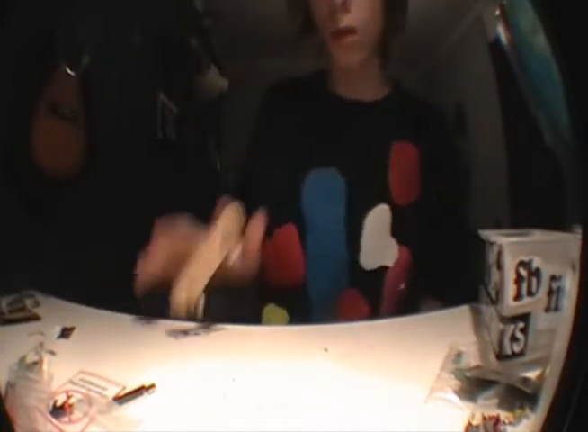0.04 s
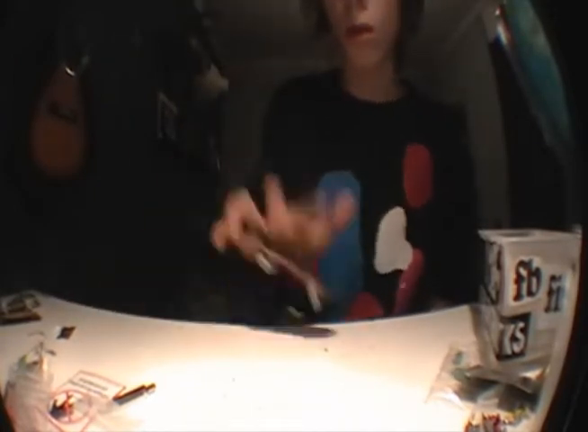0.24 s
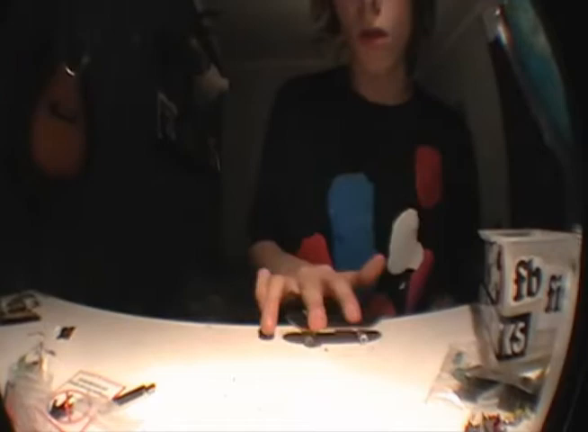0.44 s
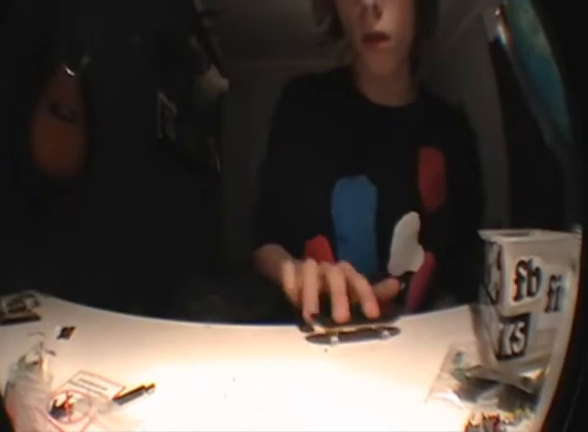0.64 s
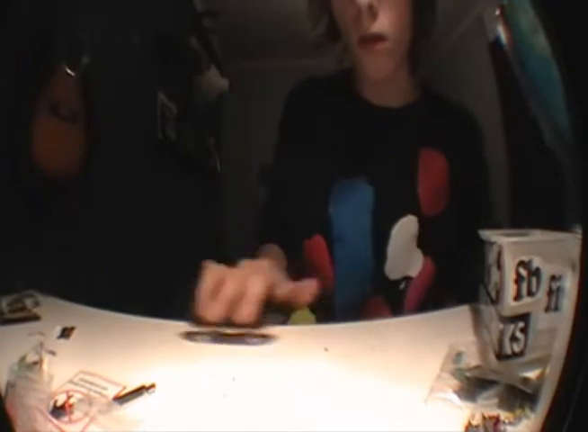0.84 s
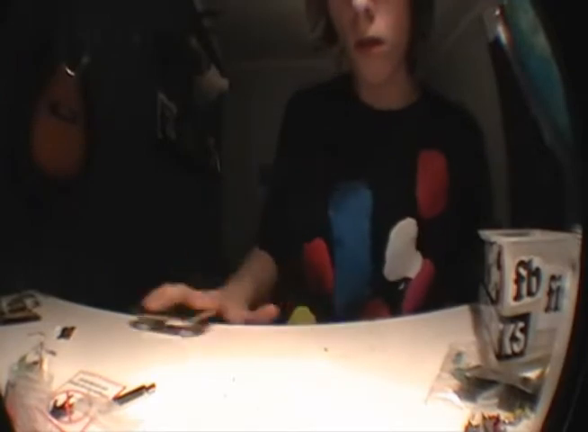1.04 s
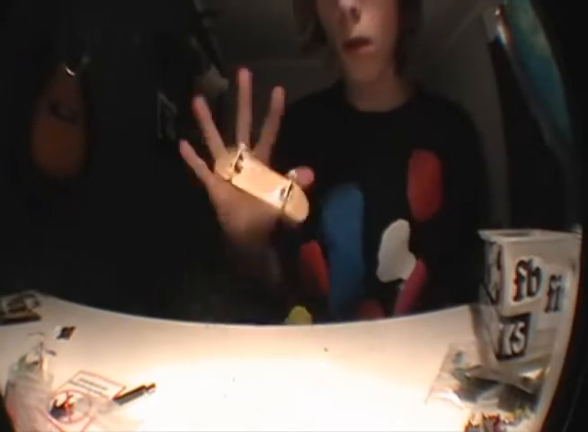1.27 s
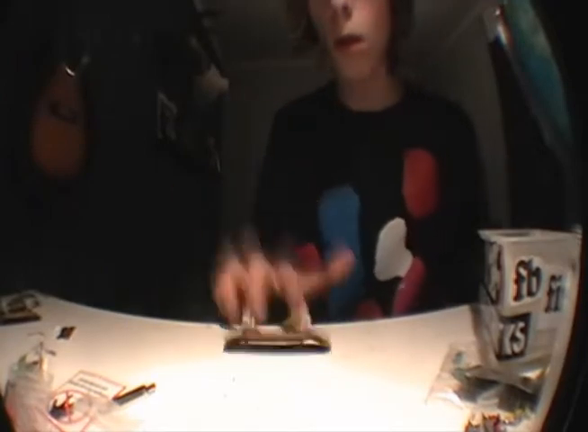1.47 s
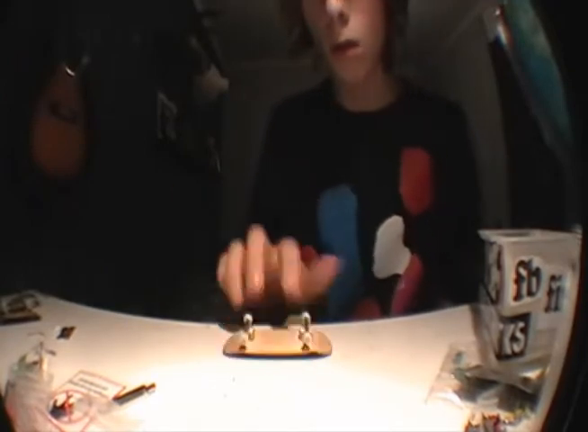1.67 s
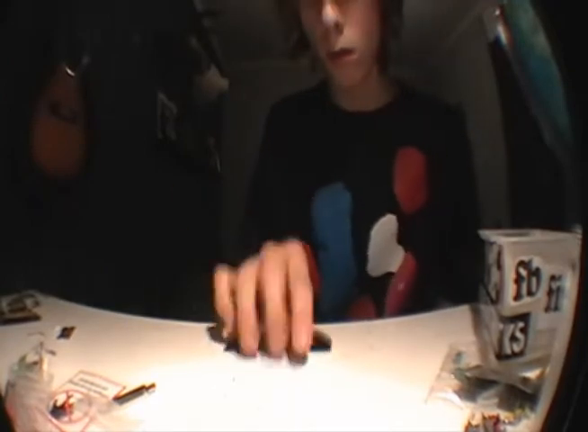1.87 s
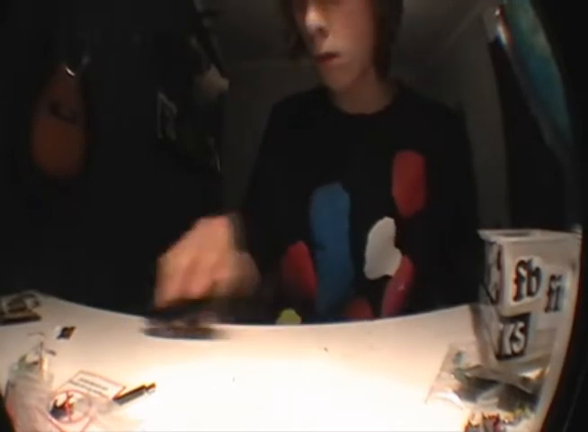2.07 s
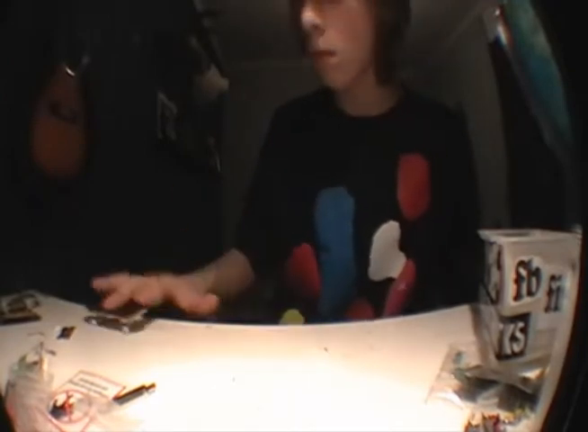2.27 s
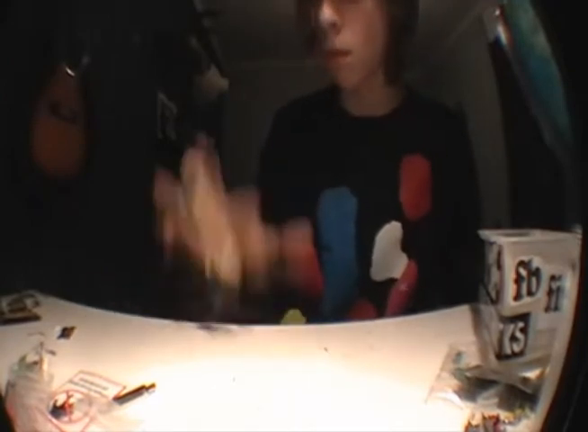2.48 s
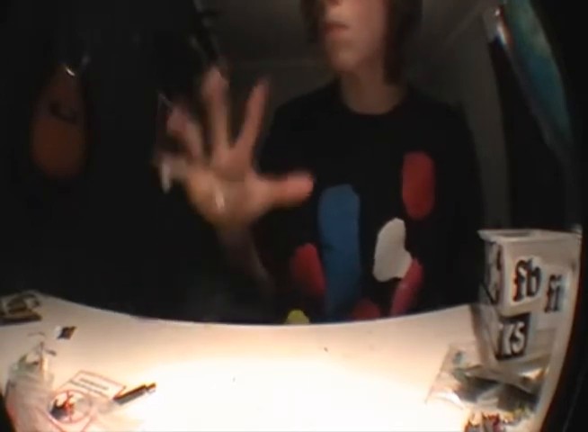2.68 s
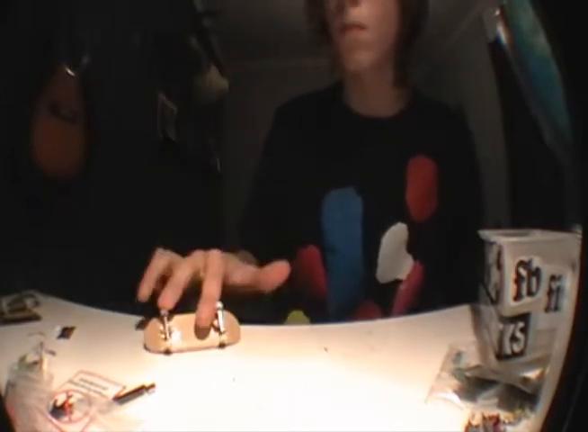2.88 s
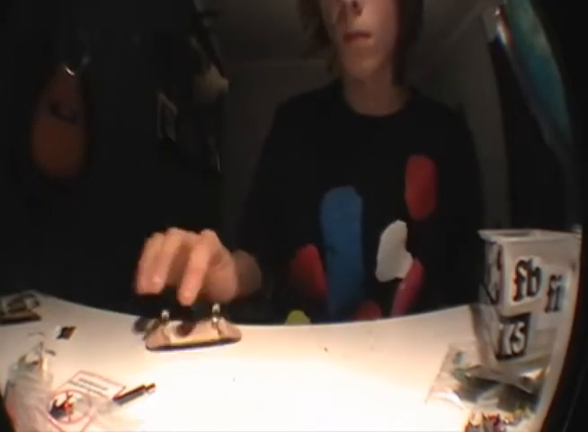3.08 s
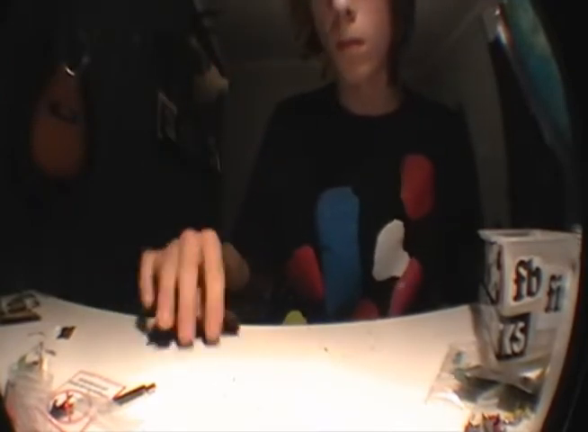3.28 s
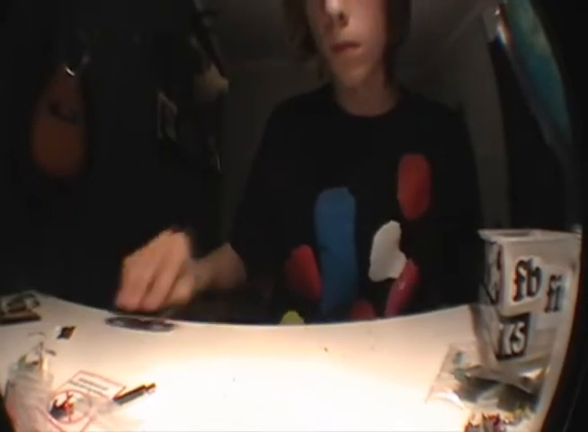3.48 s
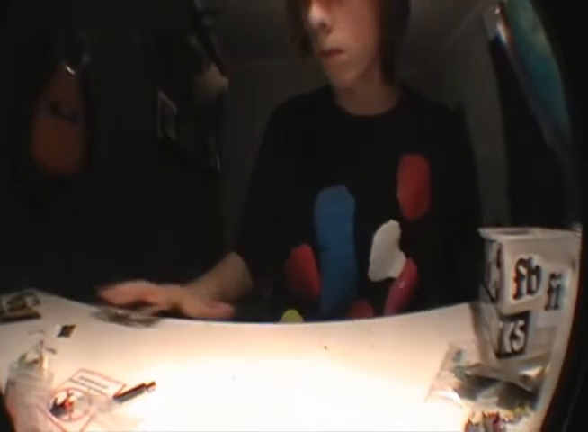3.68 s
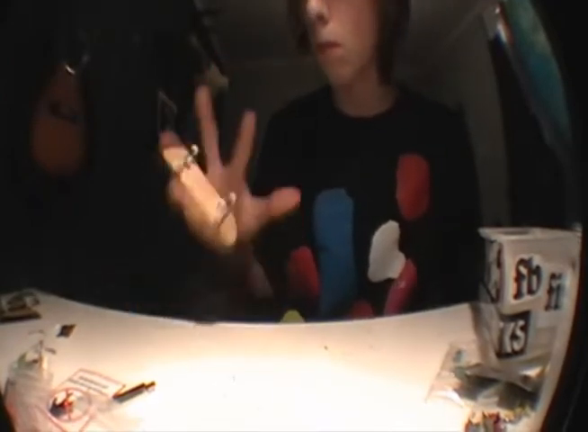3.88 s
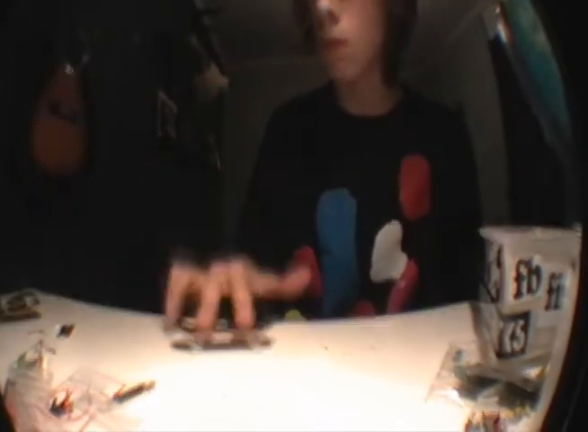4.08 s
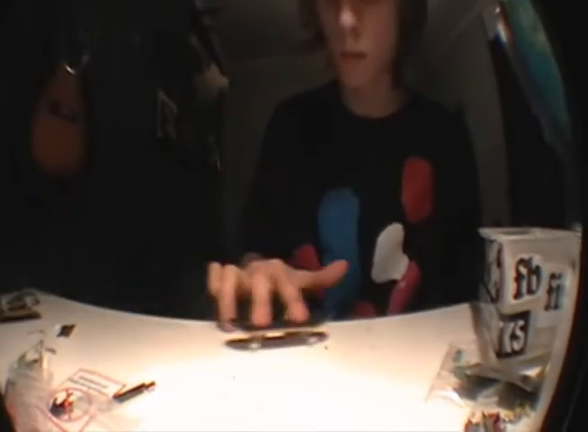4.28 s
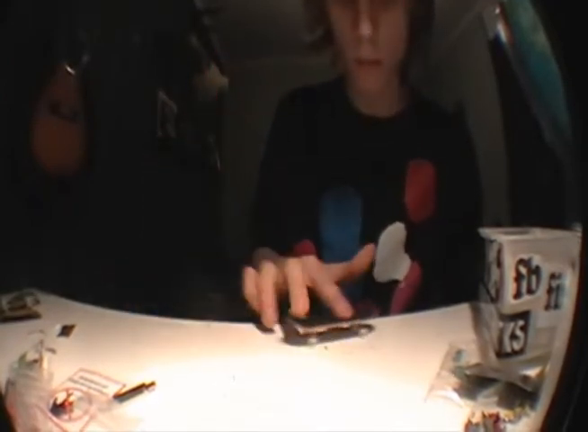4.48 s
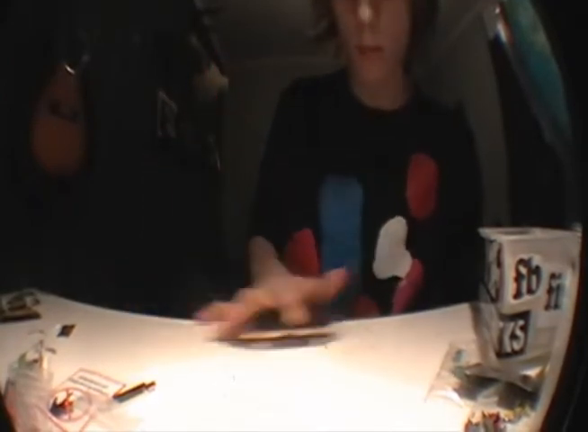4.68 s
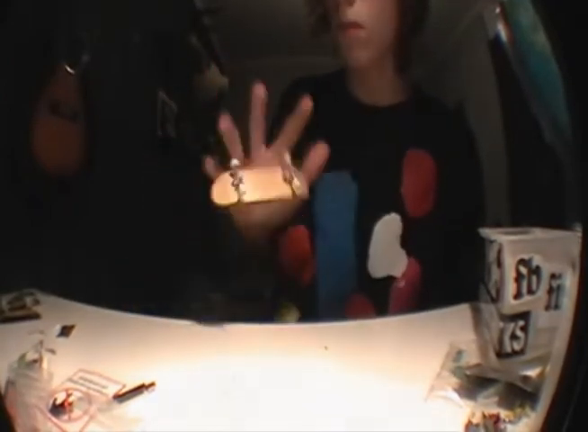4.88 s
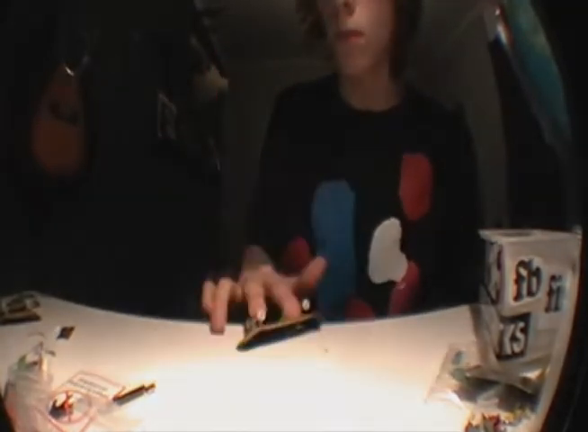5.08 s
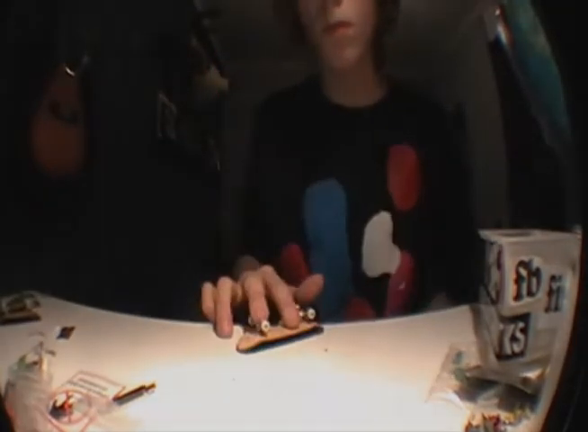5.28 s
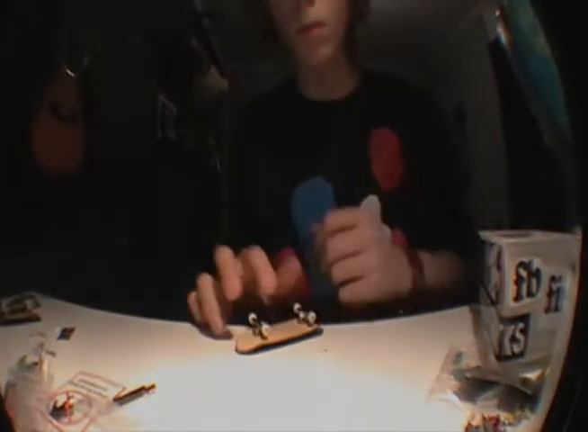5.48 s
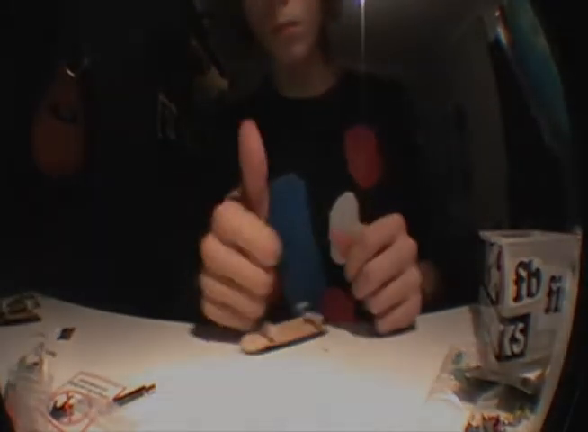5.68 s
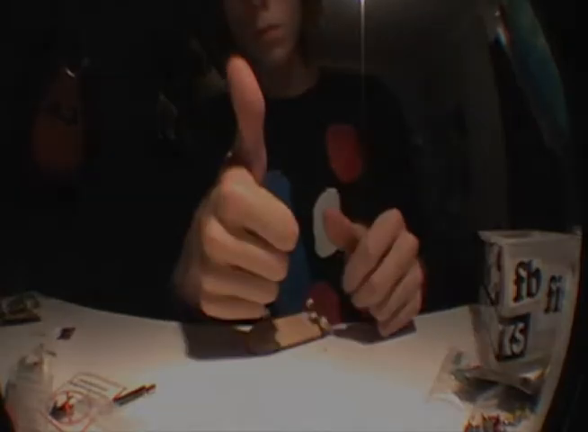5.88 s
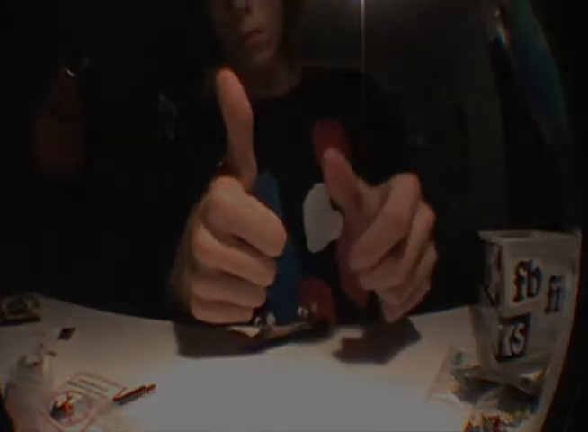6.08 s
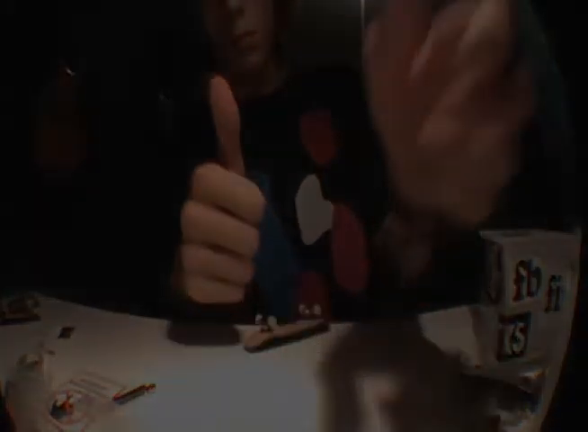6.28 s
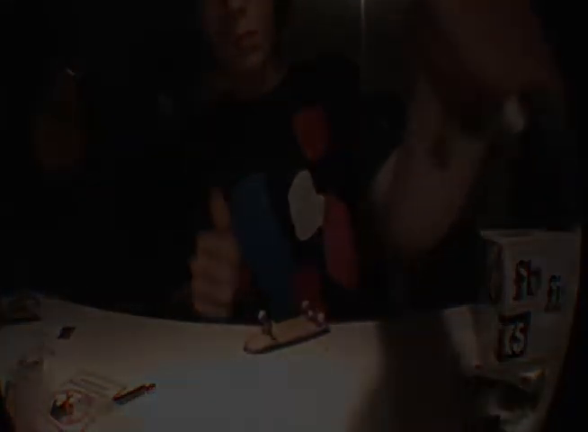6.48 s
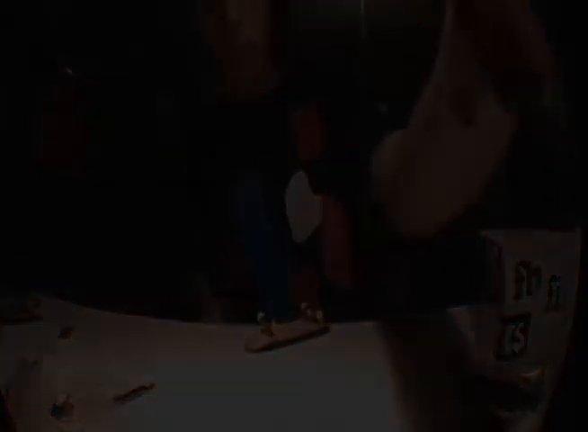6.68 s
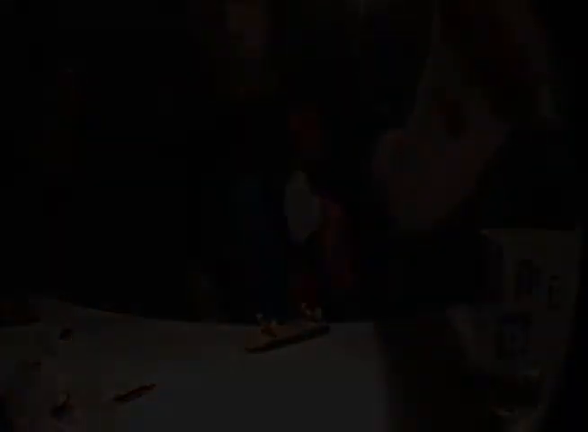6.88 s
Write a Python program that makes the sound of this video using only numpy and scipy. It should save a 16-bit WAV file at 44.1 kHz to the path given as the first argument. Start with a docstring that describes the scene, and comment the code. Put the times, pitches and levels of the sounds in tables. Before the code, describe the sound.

Sharp plywood pops and hard landings of a miniature skateboard on a table, short wheel scrapes between them, then faint hand rustles.

```python
"""A small room with a wooden table, heard close up by a camera's microphone pair: a toy skateboard ridden by two fingers.
Tail pops and landings are noise cracks that also knock the ringing deck and boom and thump the table top.
Between tricks, wheels roll and scrape as random grit driving resonances; hand and arm rub, thump and rustle.
A decaying pattern of random echoes makes the room, over steady air and hiss.
The recorder ducks after loud blows, clips their tops and is turned down at the very end."""
import sys
import numpy as np
from scipy import signal
from scipy.fft import rfft, irfft
from scipy.io import wavfile
from scipy.ndimage import uniform_filter1d

SR = 44100
rng = np.random.default_rng(int(sys.argv[2]) if len(sys.argv) > 2 else 0)


def wrap_up_sound(samples):
    """Save the sound to the file named by the first command line argument, as 16-bit audio."""
    columns = np.atleast_2d(samples).T
    # keep every value between -1 and 1, then stretch to whole-number steps
    tamed = np.clip(columns, -1, 1)
    steps = np.round(tamed * 32767).astype(np.int16)
    wavfile.write(sys.argv[1], SR, steps)


N = 306098  # length [samples]

# resonances of the plywood deck: (frequency [Hz], width [Hz], level [dB])
DECK_MODES = [(735, 88, -2), (985, 86, 0), (1130, 170, -10), (1327, 100, 0.5), (1557, 79, -5),
              (1780, 180, -12), (2154, 160, -11.5), (3040, 180, -9.5), (3500, 390, -14.5), (4220, 200, -13),
              (5300, 350, -15.5), (6170, 250, -18)]
# resonances of the table top: (frequency [Hz], width [Hz], level [dB])
TABLE_MODES = [(138.4, 44, -3), (188.9, 28, 3), (242, 170, -13), (330, 53, -6.5), (402, 79, -1),
               (517, 86, -6), (606.5, 120, -3), (700, 44, 0)]
THUMP_HZ = 60  # deepest resonance of the table


def amp(db):
    """Turns decibels into an amplitude factor."""
    return 10 ** (np.asarray(db) / 20)


def evened(x):
    """Scales a signal to an rms of one."""
    return x / np.sqrt(np.mean(x ** 2) + 1e-20)


def read(points, hz):
    """Joins a spectrum's points on a log-frequency axis."""
    f, value = np.transpose(points)
    return np.interp(np.log(hz + 1), np.log(f + 1), value)


def colour(x, points):
    """Weights a signal by a (frequency [Hz], level [dB]) spectrum."""
    size = x.shape[-1]
    gain = amp(read(points, np.fft.rfftfreq(size, 1 / SR)))
    return irfft(rfft(x) * gain, size)


def ring(x, modes):
    """Passes a drive through steep resonances of alternating sign."""
    out = np.zeros(len(x))
    for k, (hz, width, db) in enumerate(modes):
        b, a = signal.iirpeak(hz, hz / max(width, 1), SR)
        once = signal.lfilter(b, a, x)
        out += (-1) ** k * amp(db) * signal.lfilter(b, a, once)
    return out


def sweep(x, hz, width):
    """A resonance that follows the curve hz: shift down, smooth, shift back."""
    turn = np.exp(2j * np.pi * np.cumsum(hz) / SR)
    r = np.exp(-np.pi * width / SR)
    return 2 * (turn * signal.lfilter([1 - r], [1, -r], x / turn)).real


def follow(rows, column):
    """Gain over time of strokes that rise, hold and fall, evenly in dB; overlaps add in power."""
    fade_db = -31  # a stroke starts and ends this far from its hold
    power, t = np.zeros(N), np.arange(N) / SR
    for row in rows:
        corners = np.cumsum(np.abs(row[:4]))
        inside = (t >= corners[0]) & (t < corners[3])
        shape_db = np.interp(t[inside], corners, [fade_db, 0, 0, fade_db])
        power[inside] += amp(row[column] + shape_db) ** 2
    return np.sqrt(power)


def grit(per_s, spread_db):
    """Sparse clicks of widely spread size: grains of the surface passing under a contact."""
    size = amp(spread_db * np.minimum(rng.exponential(1, N), 5)) * rng.choice([-1., 1.], N)
    return size * (rng.random(N) < per_s / SR)


def pair(x):
    """Mixes two unrelated signals into a left and right that are alike in the bass and less so in the treble."""
    # left-right likeness: (frequency [Hz], likeness [0 to 1])
    likeness = [(60, 1), (1000, .97), (4000, 0.97), (8000, 0.46), (14000, 0.13)]
    size, z = x.shape[1], rfft(x)
    same = np.clip(read(likeness, np.fft.rfftfreq(size, 1 / SR)), 0, 1)
    right = same * z[0] + np.sqrt(1 - same ** 2) * z[1]
    return irfft(np.array([z[0], right]), size)


def hush():
    """Steady room air and microphone hiss: coloured noise."""
    # spectrum of the quiet room: (frequency [Hz], level [dB per Hz])
    air = [(15, -47), (25, -9), (200, -1), (309, -14.5), (405, -9), (840, -18), (1330, -13.5),
           (1440, -16.5), (8140, -24), (14000, -42), (16000, -36)]
    hush_db = -59.5  # rms
    return amp(hush_db) * evened(pair(colour(rng.standard_normal((2, N)), air)))


def room(x):
    """Sparse echoes of random sign off the walls, each band dying at its own speed."""
    # colour of the echoes: (frequency [Hz], level [dB])
    walls = [(100, -9.5), (400, 4), (1200, -7.5), (2500, -7.5), (5000, -8), (9000, -4), (15000, -0.5)]
    # time to fall by 60 dB: (frequency [Hz], time [s])
    t60 = [(100, 0.58), (260, 0.25), (700, 0.31), (1840, 0.38), (4850, 0.3), (12800, 0.21)]
    taps = np.zeros((2, SR))
    at = np.arange(300, SR - 10, 10) + rng.integers(0, 10, (2, (SR - 301) // 10))
    np.put_along_axis(taps, at, rng.choice([-1., 1.], at.shape), 1)
    hz, t, z = signal.stft(taps, SR, nperseg=512)
    fall = amp(-60 * t / read(t60, hz)[:, None])
    tail = pair(signal.istft(z * fall, SR, nperseg=512)[1])
    # silent for 6 ms, then the echoes swell in
    late = np.maximum(np.arange(tail.shape[1]) / SR - .006, 0)
    tail *= 1 - np.exp(-late / 0.0028)
    tail = colour(tail / np.linalg.norm(tail[0]), walls)
    return signal.fftconvolve(x[None], tail, axes=1)[:, :N]


def hand():
    """Skin dragging on the top rings the table; the arm's weight thumps it; cloth rustles."""
    # strokes of hand and arm on the table: (start [s], rise [s], hold [s], fall [s],
    # rubbing [dB], deep thump [dB], skin and cloth rustle [dB])
    strokes = [(0.2, 0.036, 0.016, 0.3, -43, -56.5, -62), (0.6, 0.04, .005, 0.065, -38.5, -68, -42),
               (0.695, 0.017, 0.0092, 0.025, -32.5, -34, -38), (1.25, 0.018, 0.032, 0.34, -36.5, -52, -50),
               (1.91, 0.033, 0.087, 0.032, -59.5, -45, -74), (2.59, 0.015, 0.009, 0.049, -45.5, -52, -40),
               (2.645, 0.019, 0.0045, 0.045, -51.5, -55.5, -59), (2.7, 0.035, 0.011, 0.17, -62, -65, -61.5),
               (2.882, .004, 0.017, .04, -44, -30.5, -60), (3.275, 0.013, .01, .03, -44, -50, -63),
               (3.3, 0.0096, 0.013, .1, -42, -42, -60), (3.41, 0.021, .01, 0.0093, -47, -55.5, -55.5),
               (3.89, 0.017, 0.0086, 0.062, -54, -47.5, -35), (4.06, 0.14, .01, 0.011, -49.5, -59, -54.5),
               (4.55, 0.016, .015, 0.13, -38, -52, -47.5), (4.7, .04, 0.0079, .04, -40.5, -68.5, -59),
               (4.925, 0.013, 0.027, 0.092, -31, -57.5, -43.5),
               (5.05, 0.025, 0.013, 0.0084, -70, -55, -74.5), (5.33, 0.033, 0.13, 0.12, -55, -63, -53),
               (5.445, 0.0088, 0.054, .03, -52.5, -39, -72), (5.5, 0.068, 0.019, 0.19, -51.5, -59.5, -59),
               (5.79, 0.049, 0.051, 0.053, -54.5, -70, -64), (5.92, 0.011, 0.047, .025, -46, -67, -59.5),
               (6.025, .012, 0.04, 0.044, -49, -75, -58.5), (6.11, .01, 0.032, 0.08, -47, -68, -55.5),
               (6.34, .012, 0.023, 0.037, -59.5, -77, -68), (6.3, .13, 0.046, 0.12, -77, -81.5, -56),
               (6.448, 0.013, 0.027, 0.043, -46, -69, -57), (6.52, .02, 0.038, .04, -57.5, -75, -60),
               (6.738, 0.0056, .008, 0.023, -47.5, -50, -56)]
    # how the hand's place on the top favours its modes: (frequency [Hz], level [dB])
    edge_of_top = [(100, 0.5), (141, 9), (190, 0), (400, -3.5), (600, -14)]
    # spectrum of skin and cloth: (frequency [Hz], level [dB per Hz])
    cloth = [(350, -36.5), (600, -3), (1040, -6), (1720, -13.5), (1860, -12), (2040, -15), (4630, -14),
             (14000, -42.5)]
    rub = evened(colour(ring(grit(1500, spread_db=2.5), TABLE_MODES), edge_of_top))
    thump = evened(ring(rng.standard_normal(N), [(THUMP_HZ, 40, 0)]))
    rustle = evened(colour(grit(8000, spread_db=2.5), cloth))
    out = rub * follow(strokes, column=4)
    out += thump * follow(strokes, column=5)
    return out + rustle * follow(strokes, column=6)


def rides():
    """Grit under the wheels shakes the deck in uneven bumps; sliding wheels and tail hiss."""
    # wheels on the table: (start [s], rise [s], hold [s], fall [s], rolling [dB], scrape [dB],
    # hollow under the deck [Hz])
    runs = [(0.0, 0.0013, 0.0033, 0.17, -25.5, -37, 929), (0.042, .04, 0.0023, 0.027, -39, -24.5, 1066),
            (0.464, 0.0075, 0.059, 0.29, -35.5, -39, 1047), (0.759, 0.055, .15, 0.14, -24, -31.5, 1034),
            (0.957, 0.066, 0.057, 0.038, -26.5, -37, 1065), (1.124, .065, 0.041, .012, -27.5, -27, 1024),
            (2.199, 0.0064, .045, 0.005, -38.5, -35.5, 1156), (2.281, 0.005, .005, 0.096, -25, -34.5, 999),
            (2.427, .07, 0.033, 0.0064, -27, -24, 1085), (3.521, 0.082, .018, 0.0089, -25, -29.5, 1210),
            (3.634, .012, 0.0047, 0.058, -26, -33, 974), (3.735, .08, 0.043, 0.0069, -25, -28, 1051),
            (4.24, 0.044, 0.045, 0.4, -36, -41, 1070), (4.379, .04, .05, 0.0094, -35, -48, 812),
            (4.544, 0.016, 0.085, 0.04, -36.5, -51.5, 861), (4.691, 0.087, 0.021, 0.039, -19, -23, 930)]
    # how rolling favours the deck modes: (frequency [Hz], level [dB])
    axles = [(600, -1.5), (1000, 3), (1300, -5), (1600, -14.5), (3000, -4.5), (6000, -16.5)]
    # spectrum of the scrape: (frequency [Hz], level [dB per Hz])
    scrape_spectrum = [(880, -27.5), (1500, 1.5), (1830, -1), (2000, -6), (2740, -4.5), (3060, -1),
                       (4120, -4), (4460, -5.5), (5660, -6.5), (5880, -6), (11000, -34), (13000, -41),
                       (16000, -67.5)]
    hollow_width_hz, deck_db, rumble_db = 310, -3, -13.5
    bumps = amp(2.8 * evened(uniform_filter1d(rng.standard_normal(N), 400)))
    drive = grit(2500, spread_db=2.5) * bumps
    # the air gap between deck and table shifts its pitch as the fingers tilt the board
    start, rise, *_, hz = np.transpose(runs)
    hz = np.interp(np.arange(N) / SR, start + rise, hz)
    hollow = evened(sweep(sweep(drive, hz, hollow_width_hz), hz, hollow_width_hz))
    deck = evened(colour(ring(drive, DECK_MODES), axles))
    roll = evened(hollow + amp(deck_db) * deck)
    scrape = evened(colour(grit(6000, spread_db=2.8) * bumps ** .7, scrape_spectrum))
    rumble = evened(ring(grit(2000, spread_db=2.5), TABLE_MODES))
    rolling = (roll + amp(rumble_db) * rumble) * follow(runs, column=4)
    return rolling + scrape * follow(runs, column=5)


def blows():
    """Each blow is a short crack with its own bright spot, a knock of the deck, a boom and a thump of the table."""
    # blows of board on table: (time [s], crack peak [dB], bright spot of the crack [Hz],
    # treble lift of a sharp contact [dB], deck knock [dB], table boom [dB],
    # part of the deck that rings most [Hz], share of the crack thrown into the room [dB])
    contacts = [(0.0797, -29.5, 2456, -15.5, -57.5, -39, 956, -2.5),
                (0.1302, -4, 3160, 2.5, -38, -28, 587, -7),
                (0.3842, 6.5, 4800, -4.5, -17, -35.5, 985, -5.5),
                (0.393, 2.5, 7140, 4, -21, -43.5, 694, -9),
                (0.4056, 15.5, 4400, 6.5, -3.5, -15.5, 1020, -6),
                (0.4091, 6.5, 3100, -1, -8, -23.5, 705, -13), (0.7136, -47, 3680, -2, -27, -45.5, 890, -10),
                (1.078, -34, 3150, -19, -34, -40, 990, 2.5),
                (1.1586, -30.5, 1900, -1.5, -32.5, -38.5, 1070, 3),
                (1.2469, 1, 4930, 7.5, -24, -21.5, 715, -6.5),
                (1.534, 20.5, 2990, -8, -1.5, -14, 1270, -12),
                (1.5451, 11, 2870, -14, -10.5, -25, 1330, -14.5),
                (1.93, -47, 3000, -8, -78, -57.5, 1160, -2),
                (1.954, -44.5, 5030, -4.5, -82, -69.5, 1170, .5),
                (1.97, -44, 4500, -9, -75.5, -61, 1176, .5),
                (2.0401, -29, 2040, -12, -34.5, -38.5, 1350, 4.5),
                (2.0537, 0, 3150, -9, -12.5, -28.5, 1350, -8.5),
                (2.1989, -10, 3030, -10.5, -52, -45.5, 1010, -6),
                (2.2533, -4, 5200, 3, -27, -31, 1230, -2.5),
                (2.262, 1.5, 6170, 14.5, -11.5, -26.5, 890, -9.5),
                (2.4104, -34.5, 3180, -1, -52.5, -50, 1010, -3.5),
                (2.5088, -13, 3800, -4.5, -28, -36.5, 1130, 1), (2.5419, 0, 5130, 6, -39.5, -23, 735, -5),
                (2.8852, 19, 4280, -1.5, -1.5, -15, 1480, -8), (3.279, -28, 2420, -21, -76, -54, 620, -4.5),
                (3.3153, -36.5, 3400, 0, -57, -55, 735, 5), (3.4303, -39, 1940, -7, -46, -44.5, 1040, -1),
                (3.449, -7, 2020, -10, -24.5, -29, 982, -10.5),
                (3.5387, -26, 2860, -8, -39.5, -48, 1050, -10),
                (3.5738, -6, 1680, -5.5, -22, -43.5, 1350, -8),
                (3.6069, -3, 4180, 9, -17.5, -25.5, 764, -6), (3.8714, 2.5, 5060, 7.5, -34, -21, 729, -5.5),
                (4.1636, 13.5, 6270, 8.5, -6, -44, 1630, -18.5), (4.1684, 7, 3500, 6, -10, -19, 1610, -7.5),
                (4.179, 7, 5800, 9, -25, -26, 1510, -10.5), (4.1813, 0.5, 6170, -4.5, -16.5, -24, 1120, -5),
                (4.4, -39, 6000, 0, -60, -55, 999, -5), (4.451, -25, 2900, -20, -56, -43, 999, -3),
                (4.4973, -31, 5930, -4, -53, -53.5, 988, 1), (4.5379, -13, 3960, 1, -26, -36, 950, -7),
                (4.6189, -28.5, 3160, -26, -33, -41, 740, -4),
                (4.6606, -22, 3800, -14, -38, -54.5, 950, -11.5),
                (4.685, -42.5, 2900, -5, -32, -56, 985, -1),
                (4.795, -9, 2960, 0.5, -23.5, -30, 1040, -10.5),
                (4.8448, -6.5, 3040, -1, -31.5, -30, 746, -6.5), (5.1107, 9, 2028, -7.5, -5, -14, 930, -6),
                (5.138, 6.5, 2230, -10, -18, -30.5, 1290, -21.5),
                (5.1537, -1, 1820, -9, -12, -19.5, 980, -16.5),
                (5.1708, -9, 2170, -7.5, -36.5, -22.5, 748, -26),
                (5.3058, -33.5, 2300, -3, -56, -44.5, 657, 4.5), (5.785, -29, 4040, -2, -78, -61, 963, -6),
                (6.0356, -61.5, 4510, 0.5, -55.5, -63, 575, -7),
                (6.123, -51, 2640, -2.5, -53.5, -66, 700, -8.5),
                (6.7372, -28, 3620, -4, -70.5, -73, 1330, -9),
                (6.7893, -45.5, 3180, 2, -75.5, -60, 1293, -14)]
    # spectrum of the crack: (frequency [Hz], level [dB per Hz])
    crack_spectrum = [(180, -38.5), (300, -13), (1320, -5), (2480, -2.5), (3030, -2), (4520, -2.5),
                      (6200, -1.5), (10700, -15.5), (16000, -34)]
    crack_t60_s, shake_t60_s, knock_t60_s = 0.028, .028, 0.081  # time to fall by 60 dB
    pan_mean_db, pan_spread_db = -0.14, 1.73  # blows fall a little left or right of one another
    # the thump follows the boom of the table and the force of the crack
    thump_base_db, thump_per_boom, thump_per_crack = -36.5, 0.36, 0.6
    push_s, push_db = .0012, 3.5

    near, far, t = np.zeros((2, N + SR)), np.zeros(N + SR), np.arange(SR // 2) / SR
    click = colour(1. * (np.arange(len(t)) == 64), crack_spectrum) * (t < .01)
    boom = ring(np.exp(-t / 0.00017), TABLE_MODES)
    thump = ring(np.exp(-t / 0.00067), [(THUMP_HZ, 60, 0), (95, 45, -3)])
    # the top gives way at once, before it rings
    push = t / push_s * np.exp(1 - t / push_s) * np.cos(t / push_s)
    boom = boom / boom[:900].std() + amp(push_db) * push
    boom, thump = boom / boom[:900].std(), thump / thump[:1500].std()
    fall = amp(-60 * t / crack_t60_s) * np.minimum(t / 0.000066, 1)

    for s, crack_db, hz, sharp_db, deck_db, table_db, spot_hz, room_db in contacts:
        pan_db = pan_mean_db + pan_spread_db * rng.standard_normal()
        thump_db = thump_base_db + thump_per_boom * table_db + thump_per_crack * crack_db
        noise = rng.standard_normal((2, len(t)))
        edge = [(3000, 0), (10000, sharp_db)]
        plain = evened(colour(colour(noise[0], crack_spectrum), edge))
        bright = evened(ring(plain, [(hz, 0.17 * hz, 0)]))
        crack = (plain + 0.63 * bright) * fall
        crack = amp(crack_db) * crack / abs(crack).max()

        # a short burst shakes the deck; the table feels one soft push
        # a blow with little crack is soft and misses the high modes
        soft_db = np.clip(crack_db - deck_db - 15.5, -30, 0)
        struck = [(.6 * spot_hz, -7), (spot_hz, 0), (1.5 * spot_hz, -7), (2800, soft_db - 7)]
        shake = colour(noise[1], struck) * amp(-60 * t / shake_t60_s)
        knock = ring(shake, DECK_MODES) * amp(-60 * t / knock_t60_s)
        knock = amp(deck_db) * knock / knock[:600].std()
        low = amp(table_db) * boom + amp(thump_db) * thump

        at = slice(round(s * SR), round(s * SR) + len(t))
        near[:, at] += (crack + knock + low) * amp([[pan_db / 2], [-pan_db / 2]])
        # summed over all directions the blow has a smooth spectrum of the same energy
        wide = colour(click + 1.2 * ring(click, [(hz, .5 * hz, 0)]), edge) * (t < .02)
        far[at] += amp(room_db) * wide * np.linalg.norm(crack) / np.linalg.norm(wide)
        clear = ring(colour(click, struck) * (t < .02), DECK_MODES)
        far[at] += amp(-4.5) * clear * np.linalg.norm(knock) / np.linalg.norm(clear)
        far[at] += amp(-3.5) * low
    return near[:, :N], far[:N]


def scene():
    """Sets the close sounds, wheels a little to the right, in their room and hush."""
    near, far = blows()
    wheels, arm = rides(), hand()
    close = near + wheels * amp([[-.2], [.2]]) + arm
    into_room = far + amp(-3.5) * wheels + amp(-8.5) * arm
    return close + room(into_room) + hush()


def record(dry):
    """Microphone pair, gain control that ducks after blows and climbs back, clipping, fade-out, band limit."""
    # balance of the microphone pair: (frequency [Hz], left over right [dB])
    tilt = [(30, -1.5), (200, 0), (1500, -.3), (5000, -1), (12000, -2.5)]
    # treble scattered off the camera body: (frequency [Hz], level [dB])
    scatter = [(300, -30), (1500, -18.5), (4000, -12), (8000, -12.5), (14000, 4)]
    duck_above_db, fall_db_per_s = -17, 260.0
    fade_out_s, fade_out_db, band_edge_hz = 0.19, -5, 15900
    t = np.arange(N) / SR

    dry = np.array([colour(dry[k], [(hz, db * (.5 - k)) for hz, db in tilt]) for k in range(2)])
    # the body scatters treble to the two ports with opposite sign
    smear = rng.standard_normal(700) * amp(-60 * np.arange(700) / SR / .015)
    side = signal.oaconvolve(dry.mean(0), smear / np.linalg.norm(smear))[:N]
    side = colour(side, scatter)
    low_cut = signal.butter(2, 40, "high", fs=SR, output="sos")
    dry = signal.sosfilt(low_cut, dry + side * [[1], [-1]])

    # the held level jumps up with the sound and falls back steadily; half its excess is taken off
    power = signal.lfilter([.006], [1, .006 - 1], (dry ** 2).mean(0))
    climb = t * fall_db_per_s
    held_db = np.maximum.accumulate(10 * np.log10(power + 1e-12) + climb) - climb
    ducked = dry / amp(.5 * np.maximum(held_db - duck_above_db, 0))
    clipped = np.clip(ducked, -.95, .95)
    faded = clipped * amp(np.interp(t, [N / SR - fade_out_s, N / SR], [0, fade_out_db]))
    band_limit = signal.firwin(511, band_edge_hz, window=("kaiser", 9), fs=SR)
    return signal.oaconvolve(faded, band_limit[None], "same")


dry = scene()
out = record(dry)
wrap_up_sound(out)
```